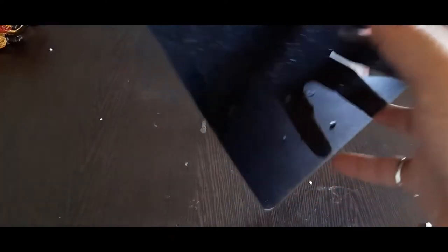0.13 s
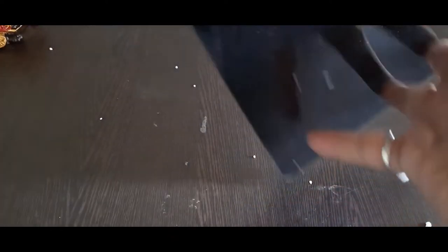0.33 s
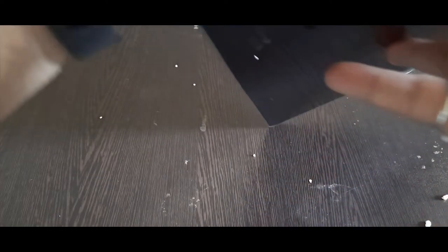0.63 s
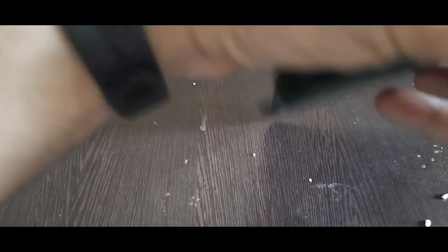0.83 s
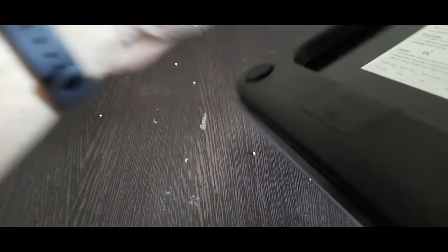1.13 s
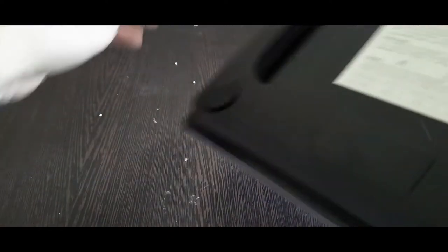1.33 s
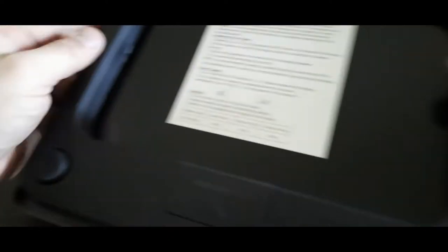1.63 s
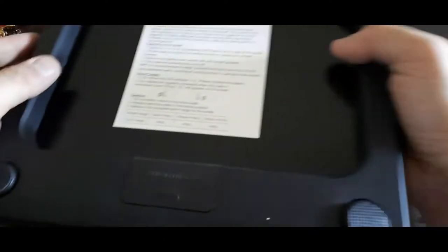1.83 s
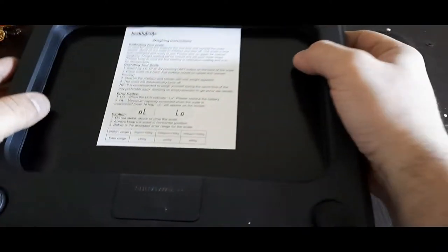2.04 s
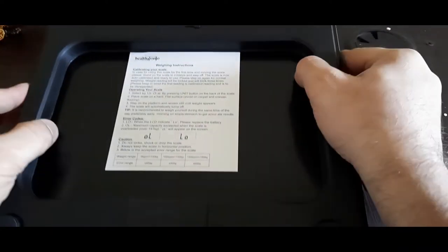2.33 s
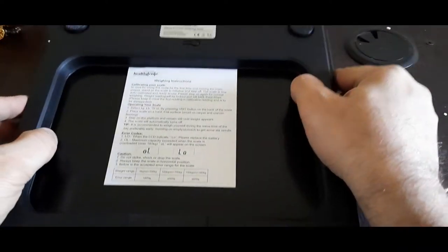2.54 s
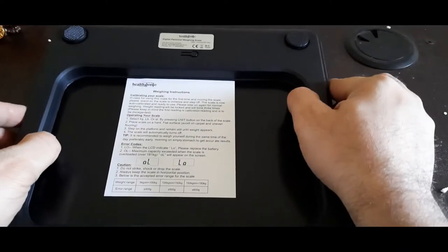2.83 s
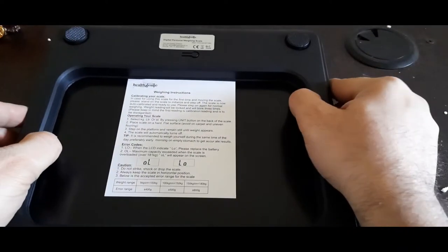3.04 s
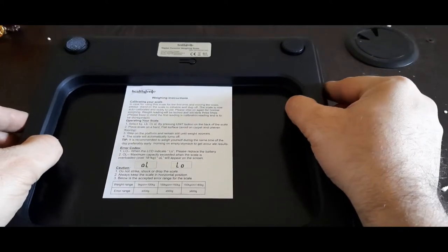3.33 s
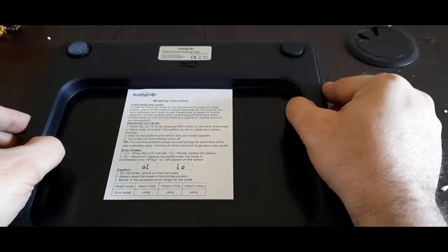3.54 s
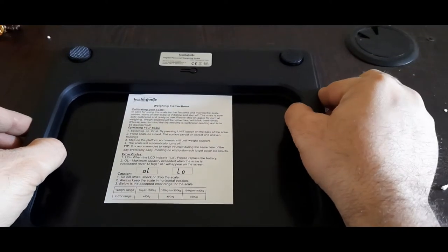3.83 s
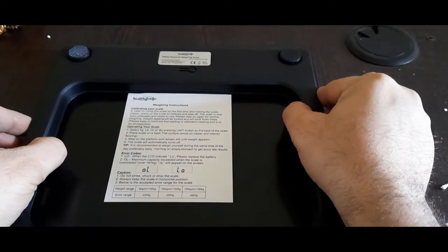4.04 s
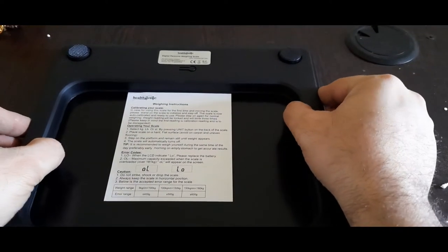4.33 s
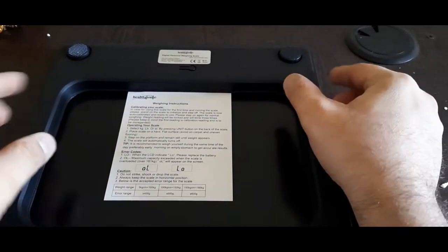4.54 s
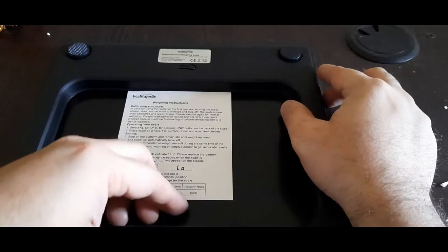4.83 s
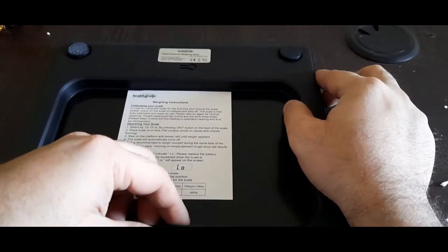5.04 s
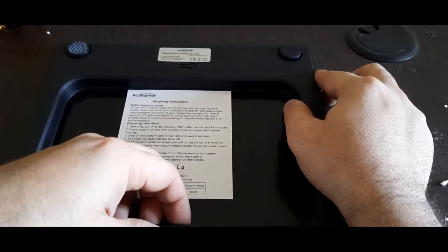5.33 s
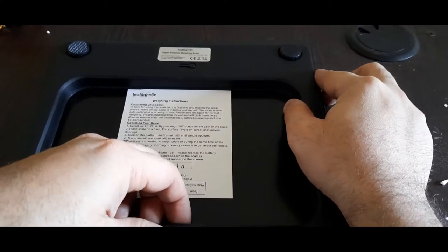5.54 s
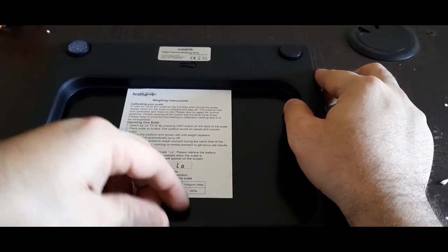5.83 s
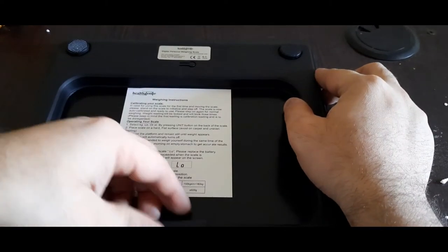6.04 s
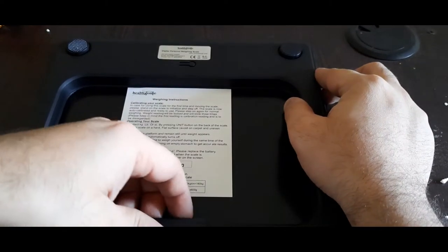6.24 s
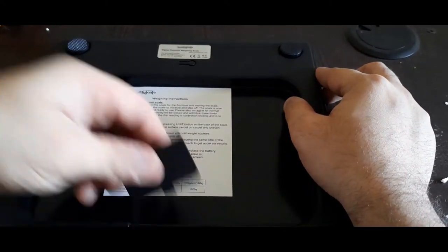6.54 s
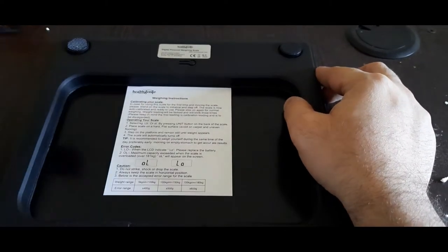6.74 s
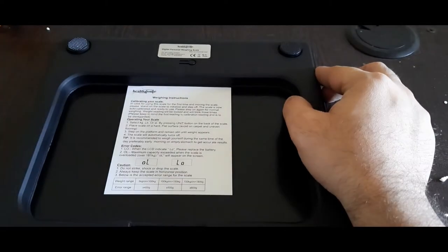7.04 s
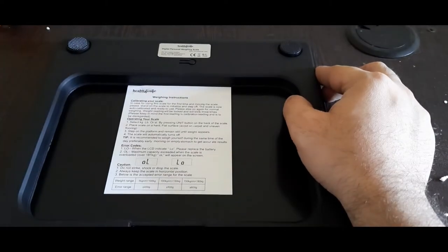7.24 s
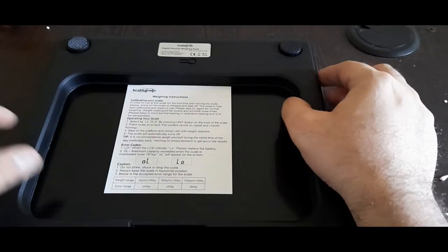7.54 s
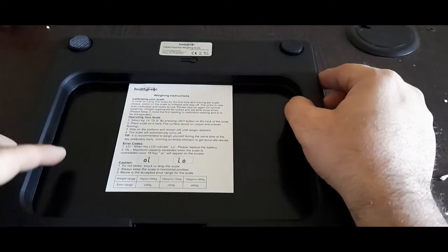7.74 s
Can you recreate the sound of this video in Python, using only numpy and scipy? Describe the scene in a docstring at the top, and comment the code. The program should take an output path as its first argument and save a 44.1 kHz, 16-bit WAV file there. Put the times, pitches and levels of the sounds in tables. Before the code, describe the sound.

In a small quiet room, a hollow plastic and glass scale knocks and slides on a wooden table, then a plastic cover snaps open.

```python
"""A low room rumble and faint hum lie under the scene, which opens with soft brushes of fingers.
A glass and plastic bathroom scale is handled on a wooden table in a small, quiet room: it clicks, knocks
on its edges and feet, skids and is slid along; a faint squeak on glass comes later, between the pushes.
Fingers then snap the battery cover open and put it aside. Contacts are noise bursts plus decaying modes,
friction is shaped noise, the skid is a train of slips, the hum a wavering sine, the rumble filtered noise."""
import sys
import numpy as np
from scipy import signal
from scipy.fft import rfft, irfft, next_fast_len
from scipy.io import wavfile

SR = 44100
rng = np.random.default_rng(int(sys.argv[2]) if len(sys.argv) > 2 else 0)


def dump(signal):
    """Clip the signal to [-1, 1] and save it as 16-bit WAV at the path in sys.argv[1]."""
    limited = np.clip(np.atleast_2d(signal).T, -1, 1)
    pcm = np.round(limited * 32767).astype(np.int16)
    wavfile.write(sys.argv[1], SR, pcm)


N = 348368  # samples, about 7.9 s


def amp(db):
    """Level law: decibels to amplitude ratio."""
    return 10 ** (np.asarray(db) / 20)


def evened(x):
    """Power normalisation: scales to an rms of one."""
    return x / np.sqrt(np.mean(x ** 2) + 1e-20)


def read(points, hz):
    """Logarithmic pitch scale: interpolates a table evenly in log frequency."""
    f, value = np.transpose(points)
    return np.interp(np.log(hz + 1), np.log(f + 1), value)


def add(mix, start_s, sound):
    """Superposition: sums a stereo sound into the mix from its start time."""
    part = mix[:, round(start_s * SR):][:, :sound.shape[1]]
    part += sound[:, :part.shape[1]]


def colour(x, points, size=4096):
    """Minimum-phase filtering by (f/Hz, gain/dB): causal, so nothing rings before a blow."""
    log_gain = np.log(amp(read(points, abs(np.fft.fftfreq(size, 1 / SR)))))
    # the Hilbert transform of the log gain supplies the minimum phase
    response = np.exp(np.conj(signal.hilbert(log_gain)))
    taps = np.fft.ifft(response).real[:size // 2]
    return signal.fftconvolve(x, taps[None], axes=1)[:, :x.shape[1]]


def dying(t, t60):
    """Exponential decay: falls by 60 dB in t60 seconds."""
    return np.exp(-np.log(1000) * t / t60)


def lifted(x, hz, width_hz, lift_db):
    """Resonance: a second-order peak changes the gain around one frequency."""
    peak = signal.lfilter(*signal.iirpeak(hz, hz / width_hz, SR), x)
    return x + (amp(lift_db) - 1) * peak


# likeness of the sound field at the two ports: f/Hz, left-right correlation
PORT_LIKENESS = [(60, 0.94), (250, 0.89), (500, 0.45), (900, -0.037), (1500, -0.04), (3000, -0.076),
                 (15000, -0.077)]


def diffuse(size):
    """Diffuse-field coherence: white stereo noise, alike at both ports only in the bass."""
    a, b = rfft(rng.standard_normal((2, size)))
    same = read(PORT_LIKENESS, np.fft.rfftfreq(size, 1 / SR))
    right = same * a + np.sqrt(1 - same ** 2) * b
    return irfft(np.array([a, right]), size)


# echoes off the table top and hands: left delay/s, right delay/s, level/dB
NEAR_ECHOES = [(.0011, 0.00073, -23), (.0023, 0.0025, -13.5), (.0046, 0.0029, -19), (.0072, 0.008, -11.5),
               (0.0113, 0.013, -10.5)]


def near_echoes(x):
    """Comb interference: close echoes differ at each port; the bass wraps round the surfaces."""
    out = x.copy()
    treble = signal.lfilter(*signal.butter(1, 600, "high", fs=SR), x)
    for *delays_s, db in NEAR_ECHOES:
        for port, delay_s in enumerate(delays_s):
            delayed = np.pad(treble[port], (round(delay_s * SR), 0))
            out[port] += amp(db) * delayed[:x.shape[1]]
    return out


# spectrum of the room rumble: f/Hz, relative level per Hz/dB
RUMBLE_COLOUR = [(15, -53.5), (30, -37), (42, -8.5), (65, 0), (120, -4.5), (200, -4), (300, -12.5),
                 (400, -15), (700, -25.5), (1200, -30), (1700, -27.5), (3000, -36.5), (6000, -48),
                 (8000, -45), (10000, -55), (16000, -50.5)]
RUMBLE_DB = -44.5  # rms level
# swells of the low hum: middle t/s, length/s, level/dB
HUM_SWELLS = [(1.955, 0.93, -48.5), (2.316, 0.64, -41), (4.93, .5, -43.5), (5.434, 0.58, -44.5),
              (5.874, 0.38, -45)]


def background(hum_hz=113, hum_db=-1, waver_hz=3, steady_db=-58, count=40):
    """Frequency and amplitude modulation: a hum wavers and swells over a low, steady rumble."""
    t = np.arange(N) / SR
    drift = np.interp(t, np.linspace(0, t[-1], count), rng.standard_normal(count))
    pitch = hum_hz + waver_hz * drift
    tone = evened(np.sin(2 * np.pi * np.cumsum(pitch) / SR))
    loudness = amp(steady_db)
    for middle_s, length_s, db in HUM_SWELLS:
        # a raised cosine, zero outside its length
        phase = np.pi * np.clip((t - middle_s) / length_s, -.5, .5)
        loudness = loudness + amp(db) * np.cos(phase) ** 2
    noise = diffuse(next_fast_len(N))[:, :N]
    rumble = near_echoes(colour(noise, RUMBLE_COLOUR, size=16384))
    return amp(hum_db) * loudness * tone + amp(RUMBLE_DB) * evened(rumble)


# resonances of the hollow plastic shell: f/Hz, width/Hz, lift/dB
SHELL_RESONANCES = [(737, 210, 6.5), (1334, 53, 2), (1640, 24, -1.5), (1833, 87, 1.5), (2478, 59, 2.5),
                    (3145, 20, 6), (4200, 37, 5.5), (4900, 55, 5.5), (6300, 150, -1), (7700, 470, 4)]


def shell(x):
    """Resonant filtering: the hollow case colours whatever touches it."""
    for hz, width_hz, lift_db in SHELL_RESONANCES:
        x = lifted(x, hz, width_hz, lift_db)
    return x


def stroke(length_s, rise_s, sag_db_per_s, release_t60):
    """Envelope of friction: a stroke gathers speed, slowly eases and then dies away."""
    t = np.arange(0, length_s + release_t60, 1 / SR)
    rise = np.sin(np.pi / 2 * np.minimum(t / rise_s, 1)) ** 2
    release = dying(np.maximum(t - length_s, 0), release_t60)
    return rise * amp(-sag_db_per_s * t) * release


def rub(envelope, points, grain_db, grain_s):
    """Friction excitation: tiny catches of uneven size under a stroke excite the shell."""
    t = np.arange(len(envelope)) / SR
    knots = np.arange(0, t[-1], grain_s)
    sizes_db = grain_db * np.interp(t, knots, rng.standard_normal(len(knots)))
    catches = diffuse(len(t)) * amp(sizes_db)
    return envelope * evened(near_echoes(shell(colour(catches, points))))


# strokes of the fingers over the case: t/s, length/s, level/dB, hiss level/dB
BRUSHES = [(0, 0.12, -52.5, -71), (0.167, .19, -50.5, -69), (0.369, 0.18, -54.5, -89),
           (0.804, 0.21, -54, -77), (0.99, 0.12, -50, -61), (1.805, .2, -45, -58),
           (4.349, 0.57, -52.5, -56), (4.905, .36, -60.5, -69.5), (6.084, .22, -69, -86),
           (6.865, .09, -65.5, -64.5), (6.987, 0.21, -50, -72), (7.273, 0.083, -59.5, -71),
           (7.724, 0.1, -62.5, -69)]
# spectrum of the brushing: f/Hz, gain/dB
BRUSH_COLOUR = [(300, 6), (900, 1), (1800, 7.5), (3000, 4), (5000, 0), (8000, 0.5), (9500, -12),
                (12000, -55)]
# spectrum of the fine hiss of brushing and sliding: f/Hz, gain/dB
HISS_COLOUR = [(6000, -60.5), (9000, 0), (12000, 4), (16000, 1.5)]


def brushing():
    """Light friction: fingers brush over the shell as the grip changes."""
    out = np.zeros((2, N))
    for s, length_s, level_db, hiss_db in BRUSHES:
        envelope = stroke(length_s, rise_s=0.33 * length_s, sag_db_per_s=4.5, release_t60=0.28)
        add(out, s, amp(level_db) * rub(envelope, BRUSH_COLOUR, grain_db=2.5, grain_s=0.01))
        add(out, s, amp(hiss_db) * rub(envelope, HISS_COLOUR, grain_db=1.5, grain_s=.004))
    return out


# drags, each a steady or gliding noise band: t/s, length/s, start f/Hz, end f/Hz, width/Hz, level/dB
SCRAPES = [(0, 0.75, 2980, 2980, 497, -59.5), (2.957, 0.066, 6560, 6100, 130, -62.5),
           (3.691, 0.27, 1020, 1108, 450, -49.5), (5.475, 0.34, 2690, 3030, 600, -61),
           (7.047, .55, 1590, 1804, 1100, -55.5), (7.683, 0.25, 1510, 1896, 1083, -55)]


def scrapes():
    """Narrow-band friction: fingertips drag and squeak on glass, an edge on wood, the cover pushed aside."""
    out = np.zeros((2, N))
    for s, length_s, start_hz, end_hz, width_hz, level_db in SCRAPES:
        size = round(length_s * SR)
        # slow complex noise, shifted up to the centre frequency
        turn = np.exp(2j * np.pi * np.cumsum(np.linspace(start_hz, end_hz, size)) / SR)
        noise = diffuse(size) + 1j * diffuse(size)
        grip = signal.lfilter(*signal.butter(2, width_hz / 2, fs=SR), noise)
        drag = evened((grip * turn).real)
        add(out, s, amp(level_db) * drag * signal.windows.tukey(size, .5))
    return out


def favour(hz, near_hz, lift_db, octaves):
    """Modal excitation: the place of contact favours modes near one frequency (dB)."""
    return lift_db * np.exp(-(np.log2(hz / near_hz) / octaves) ** 2)


def mode(t, hz, db, t60, apart_hz=900):
    """Damped oscillation: the higher the mode, the more out of step it reaches the two ports."""
    spread = min((hz / apart_hz) ** 2, 2)  # rad
    phase = 2 * np.pi * rng.random() + spread * rng.standard_normal((2, 1))
    return amp(db) * dying(t, t60) * np.sin(2 * np.pi * hz * t + phase)


# modes of the battery cover and its latch: f/Hz, level/dB, t60/s
COVER_MODES = [(822, -8.5, 0.032), (1427, -5.5, 0.025), (1550, -9.5, 0.021), (1856, -12, 0.004),
               (2185, 0, 0.0097), (4355, -3, 0.019), (6510, -6.5, 0.03), (7090, 0.5, 0.011)]


def cover_ring(t, near_hz, lift_db, octaves=0.19):
    """Modal superposition: the short modes of the thin plastic cover."""
    return sum(mode(t, hz, db + favour(hz, near_hz, lift_db, octaves), t60, apart_hz=2200)
               for hz, db, t60 in COVER_MODES)


def crack(t, t60, edge_hz):
    """Impulsive contact: the first instant is a very short, bright burst."""
    highs = signal.butter(2, edge_hz, "high", fs=SR)
    return signal.lfilter(*highs, diffuse(len(t)) * dying(t, t60))


# reverberation time of the room: f/Hz, t60/s
ROOM_T60 = [(100, 0.95), (260, 0.64), (700, 0.48), (1800, 0.56), (5000, 0.5), (13000, 0.29)]


def room_tail(t, build_s=0.0033):
    """Reverberation: reflections build up quickly and die at each frequency's own speed."""
    hz, at, z = signal.stft(diffuse(len(t)), SR, nperseg=256)
    decay = amp(-60 * at / read(ROOM_T60, hz)[:, None])
    tail = signal.istft(z * decay, SR)[1]
    return tail[:, :len(t)] * (1 - np.exp(-t / build_s))


# bands of thump, knock, clack, crack and fizz: lower f/Hz, upper f/Hz
BANDS = [(60, 600), (600, 1600), (1600, 3200), (3200, 9000), (9000, 16000)]
HARDNESS_FROM_HZ = 1030  # a harder contact tilts the spectrum upwards from here


def contact_levels(attack_db, level_db, hardness_db):
    """Contact stiffness: strength raises every band of an attack, hardness the upper ones."""
    centres = np.sqrt(np.prod(BANDS, axis=1))
    octaves_up = np.log2(np.maximum(centres / HARDNESS_FROM_HZ, 1))
    return level_db + np.array(attack_db) + hardness_db * octaves_up


def voiced(x, levels_db, size=1024):
    """Band energy: filters a contact towards the given level of its attack in each band."""
    power = (abs(rfft(x[:, :size])) ** 2).mean(0) * 2 / size ** 2
    hz = np.fft.rfftfreq(size, 1 / SR)
    points = []
    for (lo, hi), db in zip(BANDS, levels_db):
        gain_db = db - 10 * np.log10(power[(hz >= lo) & (hz < hi)].sum())
        points += [(lo * np.sqrt(3 / 2), gain_db), (hi / np.sqrt(3 / 2), gain_db)]
    return colour(x, points)


# fingers and plastic cover: t/s, level/dB, hardness/(dB per octave), ring f/Hz, ring lift/dB, burst t60/s
CLICKS = [(0.486, -40.5, -5, 1480, 3, 0.065), (0.504, -42.5, -6.5, 1340, 10, 0.009),
          (1.742, -52.5, -4.5, 1360, 3, 0.011), (2.234, -45, -1.5, 1030, 21, 0.015),
          (5.7658, -24.5, -1.8, 1330, 13.5, 0.018), (5.832, -32, -1.9, 1550, 24, 0.045),
          (6.3078, -27.5, -2, 2090, 23.5, 0.017), (6.409, -59, 4, 1700, 2, 0.018),
          (6.4881, -31.5, 1.5, 1530, 27, 0.0039), (6.4926, -28, 3, 1650, 5.5, 0.014),
          (6.538, -41, 3, 1640, 12, 0.03), (6.557, -48, 5.5, 1610, 11, 0.045),
          (6.5847, -35, 0.5, 1930, 25, 0.051), (6.982, -55.5, 4.5, 1600, 1, 0.022),
          (7.08, -47.5, -1, 1370, 5, 0.013), (7.158, -48.5, 1, 1740, 0, 0.025)]
# attack of an ordinary click, one entry per band: level/dB
CLICK_ATTACK_DB = [-9, -3, -1.5, -1, -8]
# dense ringing of the cover: f/Hz, gain/dB
COVER_COLOUR = [(60, -17.5), (500, -20), (800, 0.5), (1200, -6), (2200, 0), (3000, -3), (4500, -7.5),
                (8000, -10), (10000, -18.5), (16000, -18)]


def clicks(room_db=-20.5, crack_db=3, ring_db=-12, width_hz=600, lowest_share=0.61,
           contact_s=0.00094, firm_db=-26, doubling_db=14, ring_share=0.21, ring_octaves=0.65):
    """Impact of small bodies: plastic snaps, rings and echoes faintly; lighter touches start more softly."""
    out, t = np.zeros((2, N)), np.arange(SR // 2) / SR
    centres = np.sqrt(np.prod(BANDS, axis=1))
    for s, db, hardness_db, hz, lift_db, t60 in CLICKS:
        levels_db = contact_levels(CLICK_ATTACK_DB, db, hardness_db)
        levels_db = levels_db + ring_share * favour(centres, hz, lift_db, ring_octaves)
        # the onset lengthens twofold for each doubling_db below a firm touch
        onset_s = contact_s * 2 ** ((firm_db - levels_db.max()) / doubling_db)
        onset = 1 - np.exp(-t / onset_s)
        burst = diffuse(len(t)) * dying(t, t60)
        direct = onset * (burst + amp(crack_db) * crack(t, t60=0.0025, edge_hz=1570))
        body = shell(colour(direct + amp(room_db) * room_tail(t), COVER_COLOUR))
        snap = lifted(body, hz, width_hz, lift_db)
        snap = snap + amp(ring_db) * onset * cover_ring(t, hz, lift_db)
        # a small part radiates less below its own ring
        lowest_hz = hz * lowest_share
        snap = colour(snap, [(lowest_hz / np.sqrt(2), -8), (lowest_hz, 0)])
        add(out, s, voiced(snap, levels_db))
    return out


# modes of the table top with the scale on it: f/Hz, level/dB
TABLE_MODES = [(73, -8), (91, -4), (123, 1), (208, -8.5), (236, -3), (267, 0), (328, 0), (448, -6),
               (545, -21.5), (577, -2), (660, -1.5), (755, -1), (862, -4.5), (1020, -5), (1086, -11),
               (1230, -2.5), (1326, -7.5), (1427, 5), (1573, -12), (1685, 1), (1760, -7), (1836, -15.5),
               (1916, -3), (2088, -2.5), (2320, -11.5), (2480, -1), (2545, -7.5), (2640, -4.5), (2767, -10),
               (3354, -17)]


def table_ring(t, near_hz, lift_db, bass_t60=0.6, damping=0.46, octaves=0.13):
    """Modal damping: modes of the table and scale ring together; the higher ones die sooner."""
    lowest_hz = TABLE_MODES[0][0]
    return sum(mode(t, hz, db + favour(hz, near_hz, lift_db, octaves), bass_t60 * (lowest_hz / hz) ** damping)
               for hz, db in TABLE_MODES)


# scale against table: t/s, level/dB, hardness/(dB per octave), weight behind it/dB,
# strongest table resonance f/Hz, its lift/dB
KNOCKS = [(0.577, -30, 0, 10, 289.5, 13.5), (0.611, -49, 4, 25, 207, 18), (2.818, -26.5, 0.2, 2, 235, 12.5),
          (2.836, -26.5, -1, 1, 227, 13.5), (3.206, -21.5, 0.34, -2, 256.6, 11.5),
          (3.513, -40.5, -4, -2, 263, -3.5), (3.67, -32, -4.4, -2, 283, 10),
          (3.924, -19.5, 4, -3.5, 248, 5.5), (4.547, -44.5, 2, 4.5, 245, -3),
          (5.077, -47, 1.3, 4.5, 258.5, 2), (7.555, -39, 0.4, 4, 254, -6)]
# attack of an ordinary knock, one entry per band: level/dB
KNOCK_ATTACK_DB = [0.5, 0.5, 1.5, -7.5, -24]
# dense ringing of the case: f/Hz, gain/dB
CASE_COLOUR = [(50, -8), (120, 5.5), (400, 6), (1000, 1.5), (1700, 3), (2600, 3), (3600, -3), (6000, -13.5),
               (8000, -17), (10000, -31.5), (16000, -38)]


def knocks(ring_db=-18, room_db=-11.5, crack_db=5, clatter_t60=0.041, contact_s=0.0016, halving_db=3.5):
    """Impact: a knock cracks, clatters the case, rings table and room; harder ones start faster."""
    out, t = np.zeros((2, N)), np.arange(SR * 3 // 4) / SR
    for s, db, hardness_db, weight_db, hz, lift_db in KNOCKS:
        clatter = diffuse(len(t)) * dying(t, clatter_t60)
        clatter = clatter + amp(crack_db) * crack(t, t60=0.019, edge_hz=2000)
        case = shell(colour(clatter + amp(room_db) * room_tail(t), CASE_COLOUR))
        # the onset halves for each halving_db of hardness
        onset = 1 - np.exp(-t / (contact_s * .5 ** (hardness_db / halving_db)))
        blow = (near_echoes(case) + amp(ring_db) * table_ring(t, hz, lift_db)) * onset
        levels_db = contact_levels(KNOCK_ATTACK_DB, db, hardness_db)
        levels_db[0] += weight_db  # weight only adds to the thump
        add(out, s, voiced(blow, levels_db))
    return out


def skid(start_s=.683, length_s=0.066, slip_hz=135, jitter=0.117, level_db=-28,
         grit_db=-5, grip_t60=0.67, count=16):
    """Stick-slip: a rubber foot sticks and slips on the wood, shaking the table that it damps."""
    t = np.arange(SR // 2) / SR
    at = np.cumsum(1 + jitter * rng.standard_normal(count)) / slip_hz
    slips = np.zeros(len(t))
    # slips swell and fade over length_s; any later ones are silent
    slips[(at * SR).astype(int)] = np.sin(np.pi * np.minimum(at / length_s, 1))
    grit = evened(colour(diffuse(len(t)) * dying(t, 0.41), CASE_COLOUR))
    body = table_ring(t, near_hz=285, lift_db=9.5) * dying(t, grip_t60) + amp(grit_db) * grit
    shake = signal.fftconvolve(body, slips[None], axes=1)
    shake = colour(shake, [(60, 6), (130, -3.5), (270, 5.5), (500, -5.5), (1500, -12.0), (7000, -8)])
    out = np.zeros((2, N))
    add(out, start_s, amp(level_db) * shake / shake[:, :SR // 10].std())
    return out


# pushes of the case over the wood: t/s, length/s, level/dB, hiss level/dB
SLIDES = [(1.648, .18, -54.5, -71), (1.805, .455, -40, -45.5), (2.239, 0.57, -46, -56.5),
          (3.099, .37, -47, -58.5), (3.453, 0.56, -50.5, -72)]
# spectrum of the sliding scrape: f/Hz, gain/dB
SLIDE_COLOUR = [(150, -18), (280, 4), (450, 0), (580, -8.5), (1000, -9.5), (1700, -0.5), (2500, -5.5),
                (3200, -5.5), (4500, -14), (6000, -17), (8200, -17), (9200, -22.5), (12000, -44)]


def sliding():
    """Sliding friction: the upturned scale is pushed into place; fine hiss builds later than the scrape."""
    out = np.zeros((2, N))
    for s, length_s, level_db, hiss_db in SLIDES:
        scrape = stroke(length_s, rise_s=0.056, sag_db_per_s=7, release_t60=0.3)
        hiss = stroke(length_s, rise_s=0.17, sag_db_per_s=12, release_t60=0.35)
        add(out, s, amp(level_db) * rub(scrape, SLIDE_COLOUR, grain_db=1.5, grain_s=.002))
        add(out, s, amp(hiss_db) * rub(hiss, HISS_COLOUR, grain_db=1.5, grain_s=.002))
    return out


def scene():
    """Superposition: all sounds arriving at the two microphone ports."""
    return background() + brushing() + scrapes() + clicks() + knocks() + skid() + sliding()


# colour of the two microphone ports: f/Hz, left gain/dB, right gain/dB
PORT_COLOURS = [(100, 0.4, 2), (600, -0.5, 0.47), (1445, -0.5, 2), (2503, -6.5, -5), (4830, -4, -2.5),
                (5570, -3, -1), (7990, -3.5, 5), (9700, -1.5, -12.5), (10980, 0.5, -15), (12900, 1.5, -5.5),
                (16000, -5, -14.5)]
EDGE_HZ = 16050  # upper band limit


def record(dry):
    """Transducer response: each port has its own colour; then full scale and the band limit."""
    hz, left_db, right_db = np.transpose(PORT_COLOURS)
    ports = np.vstack([colour(x[None], np.c_[hz, db]) for x, db in zip(dry, (left_db, right_db))])
    lowpass = signal.firwin(255, EDGE_HZ, window=("kaiser", 8), fs=SR)
    return signal.oaconvolve(np.clip(ports, -1, 1), lowpass[None], "same")


dry = scene()
out = record(dry)
dump(out)
```